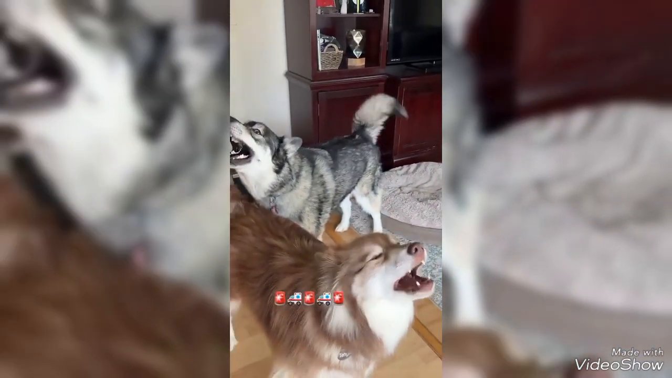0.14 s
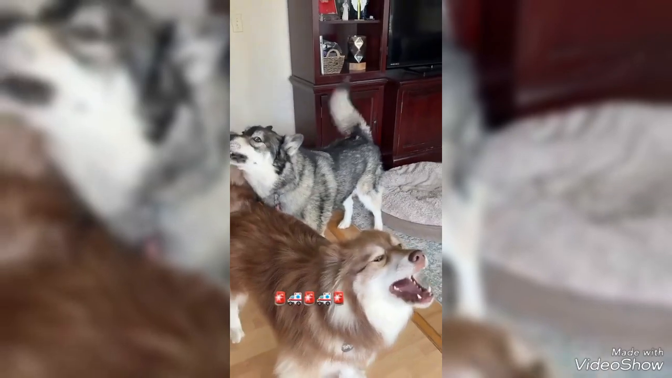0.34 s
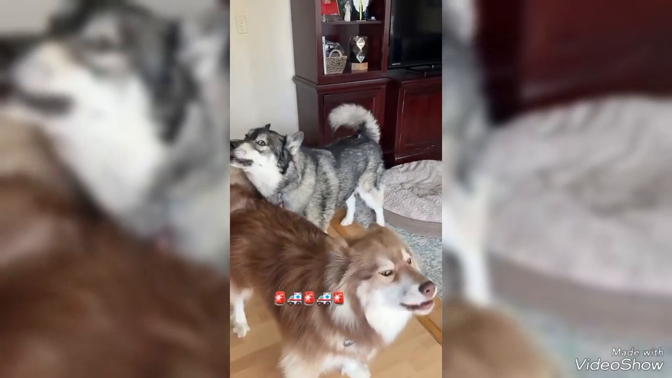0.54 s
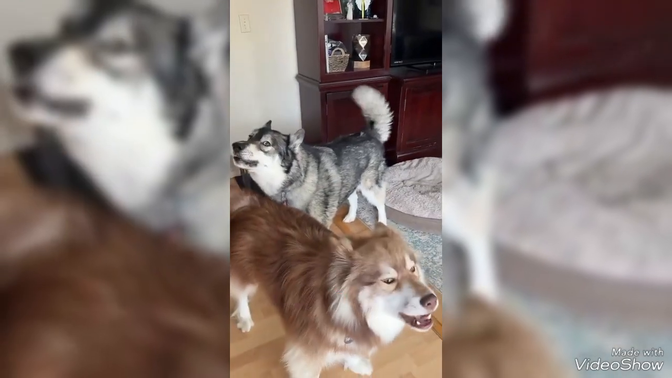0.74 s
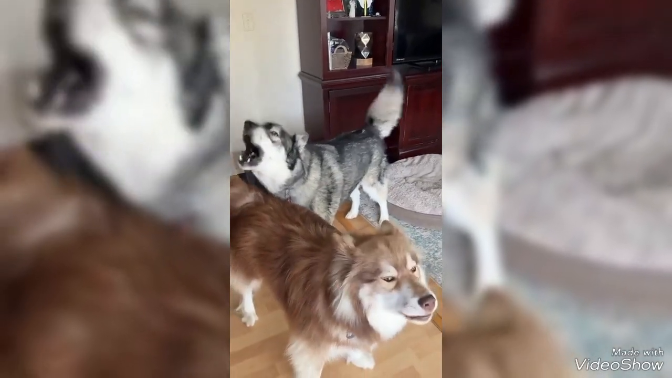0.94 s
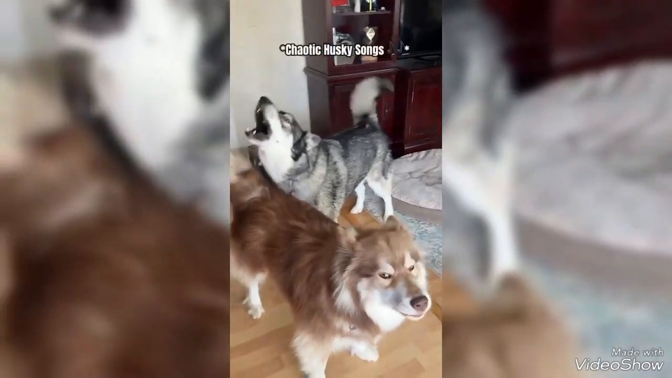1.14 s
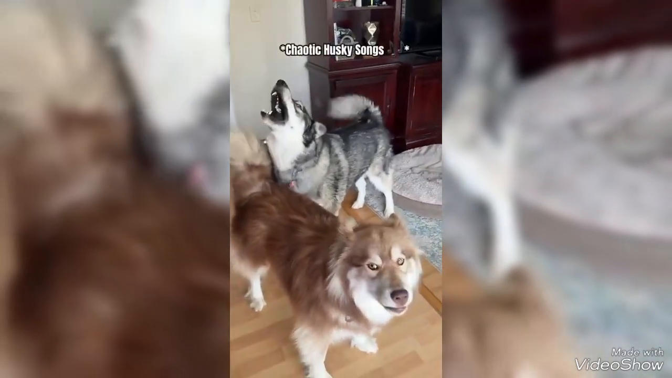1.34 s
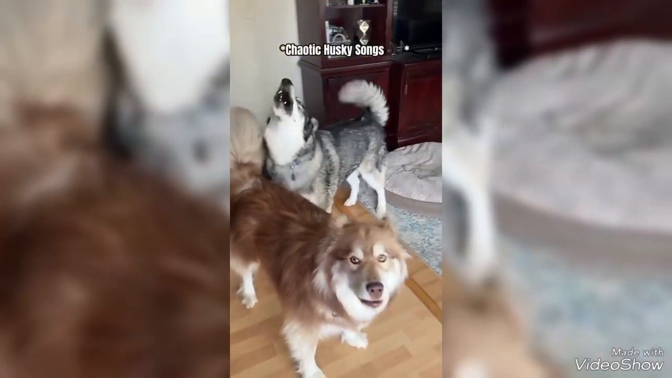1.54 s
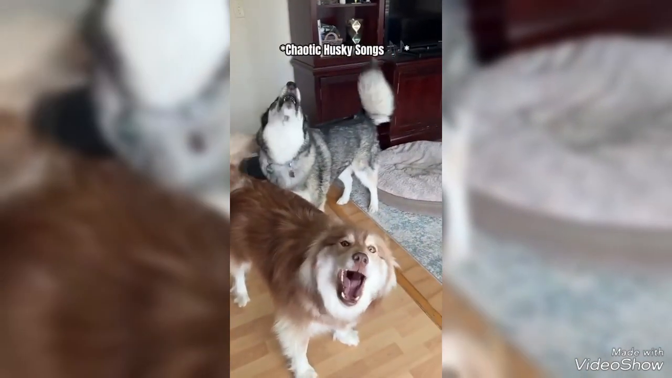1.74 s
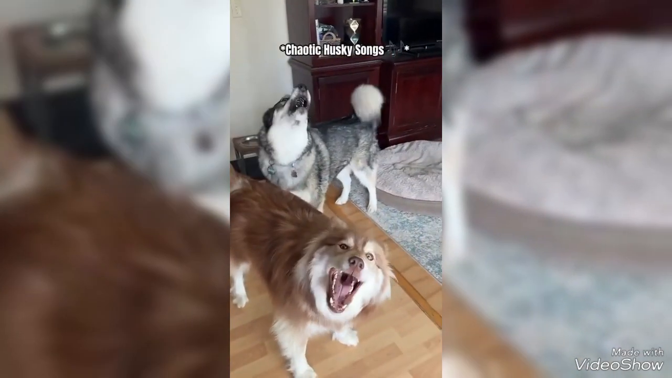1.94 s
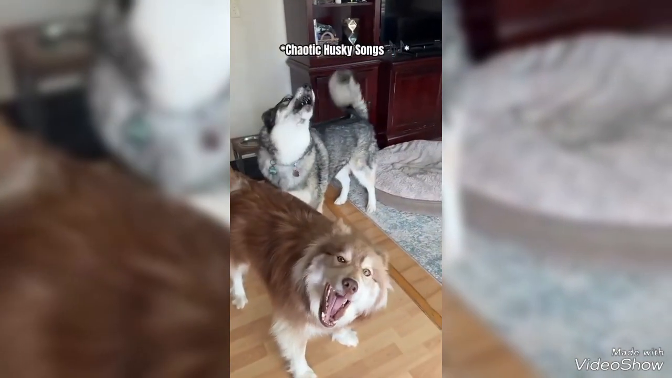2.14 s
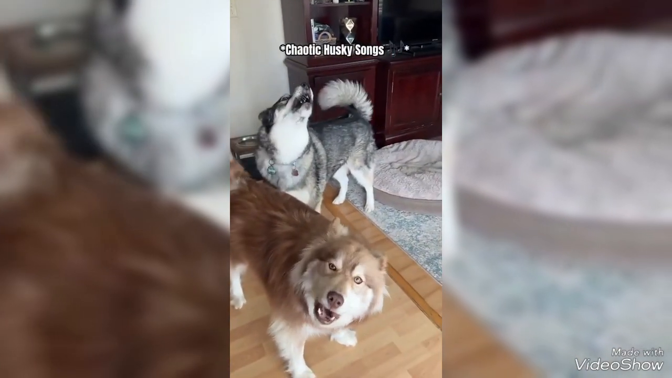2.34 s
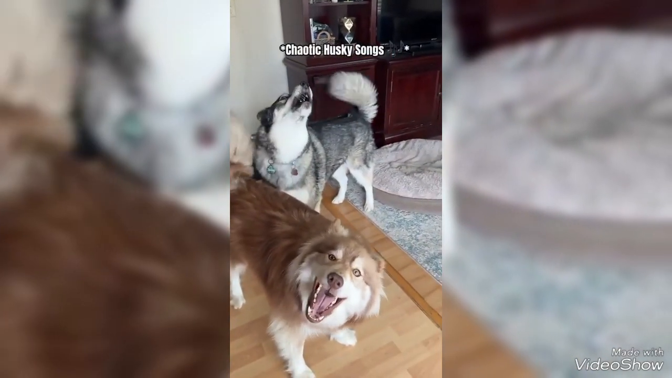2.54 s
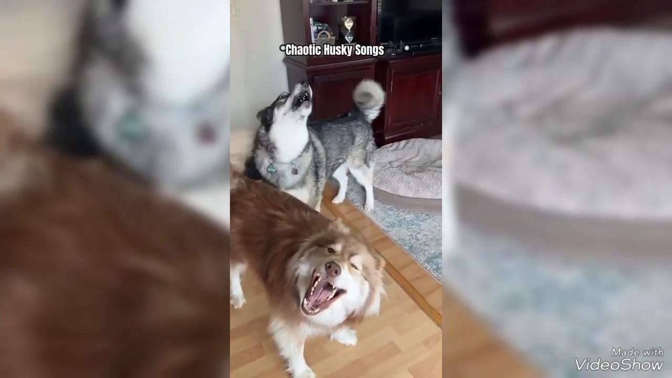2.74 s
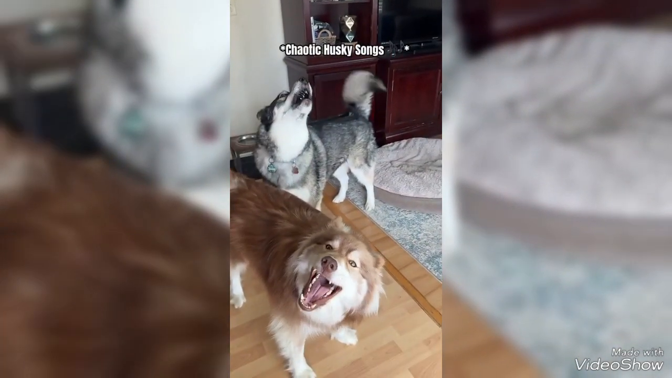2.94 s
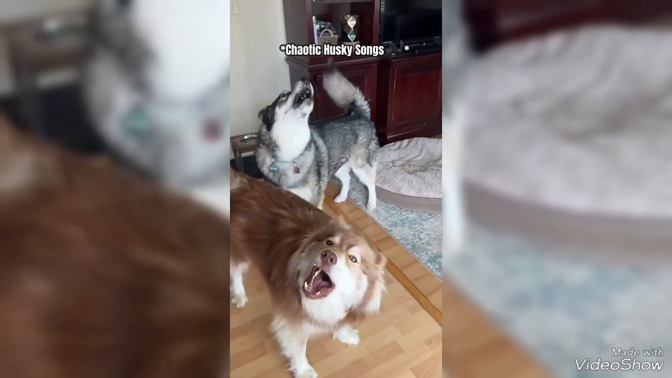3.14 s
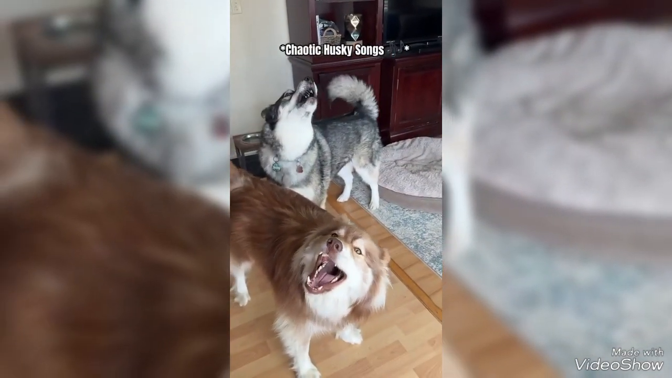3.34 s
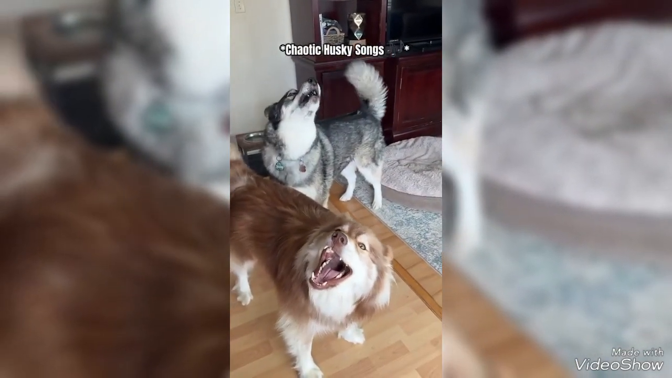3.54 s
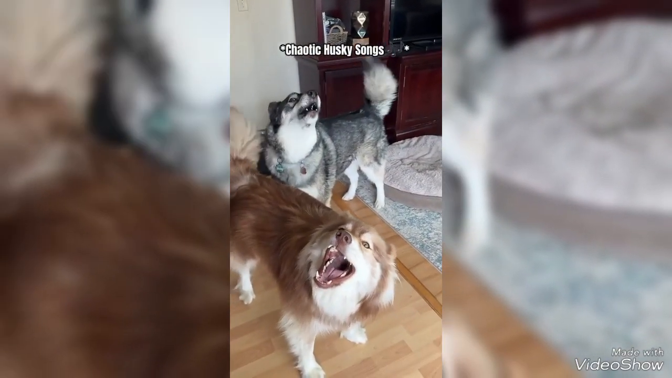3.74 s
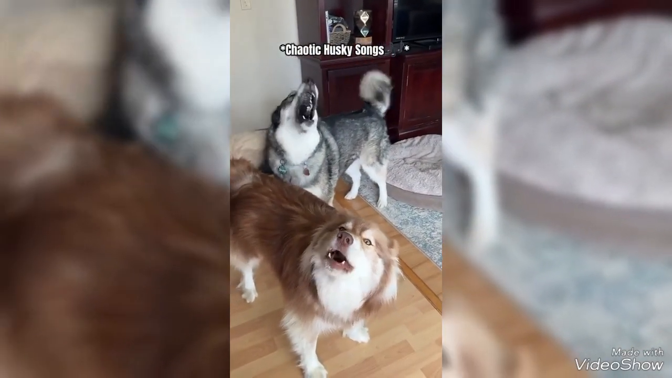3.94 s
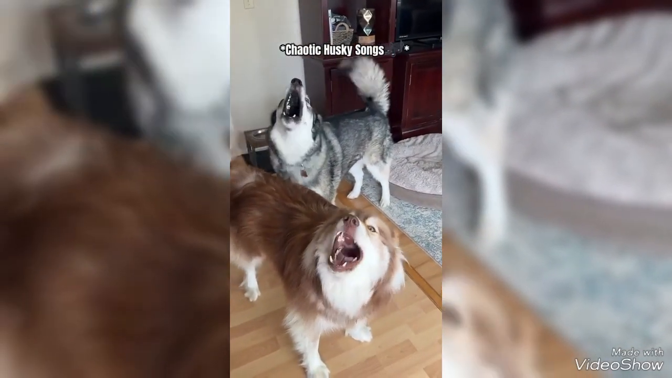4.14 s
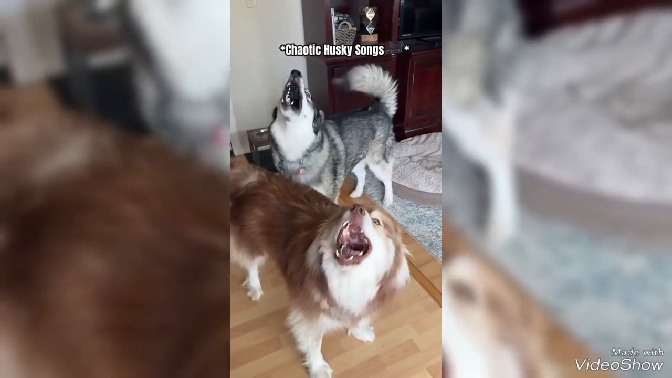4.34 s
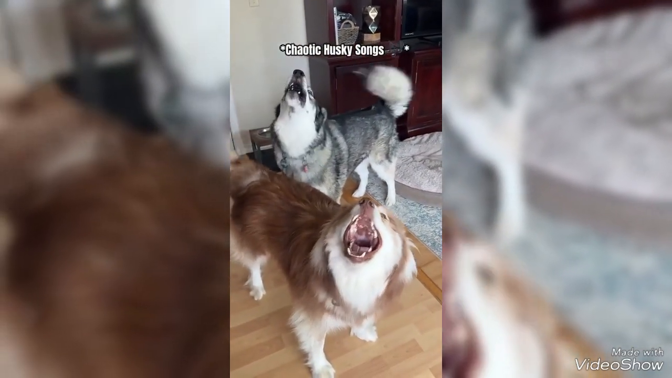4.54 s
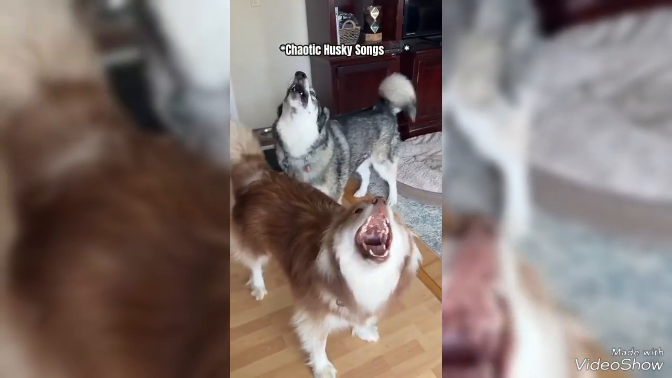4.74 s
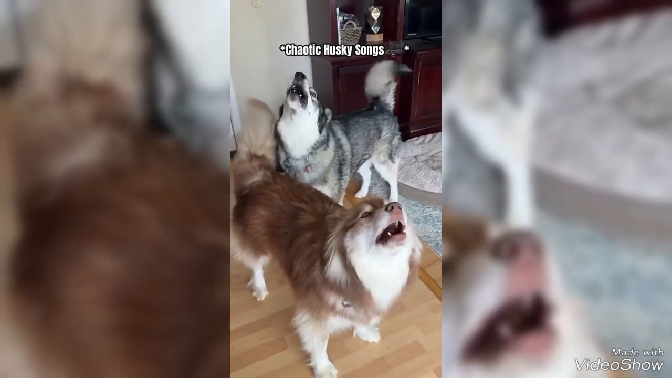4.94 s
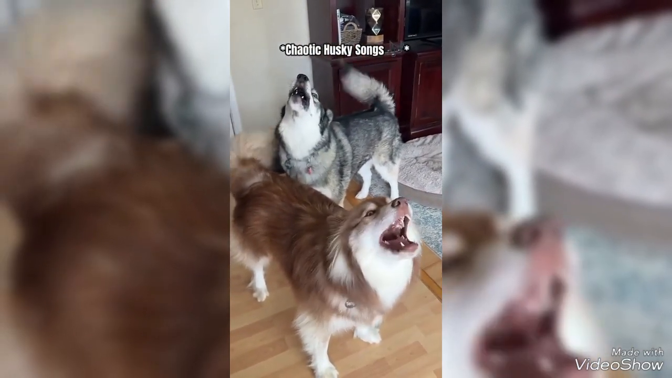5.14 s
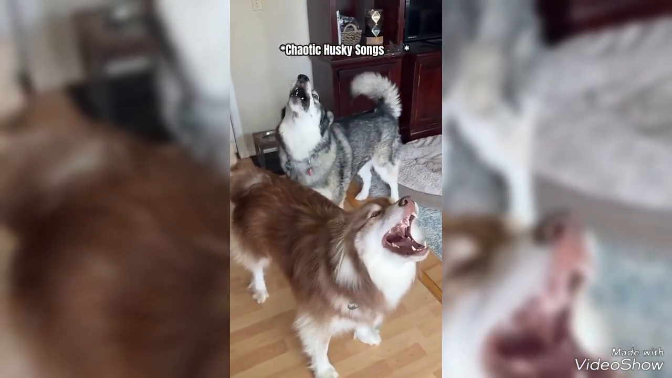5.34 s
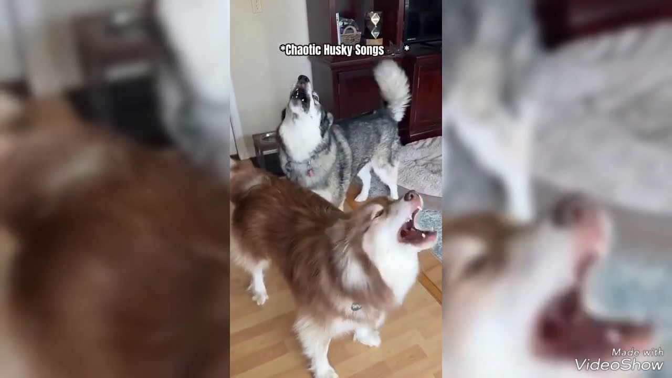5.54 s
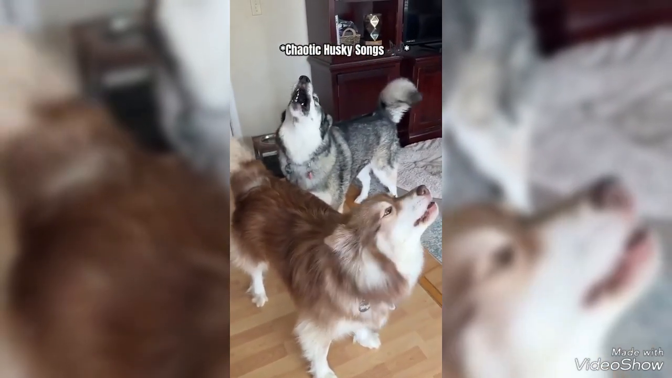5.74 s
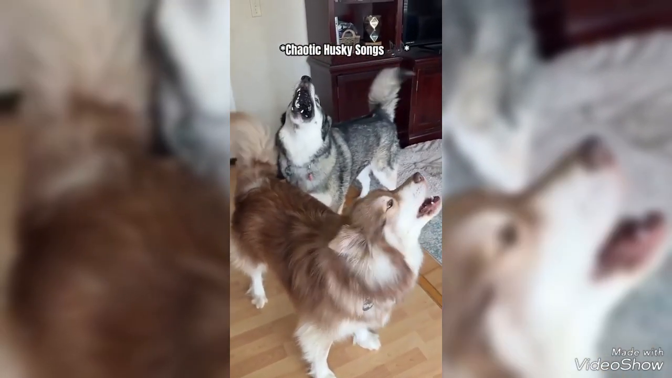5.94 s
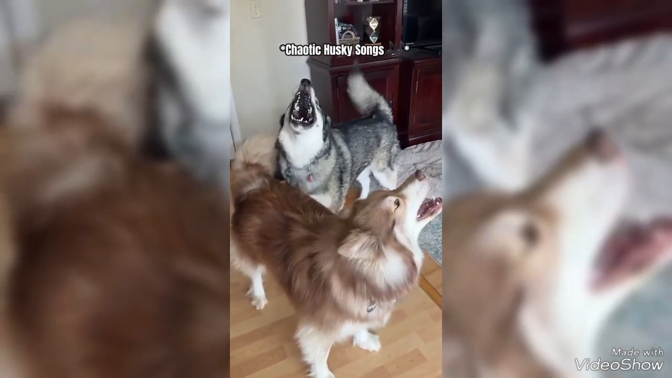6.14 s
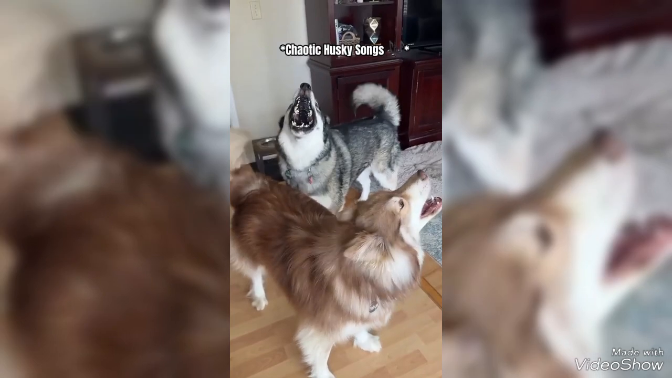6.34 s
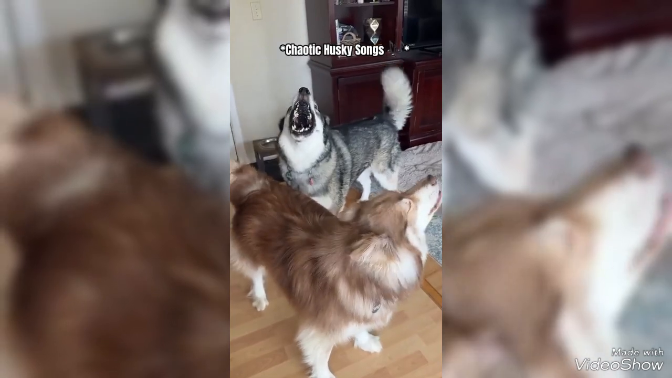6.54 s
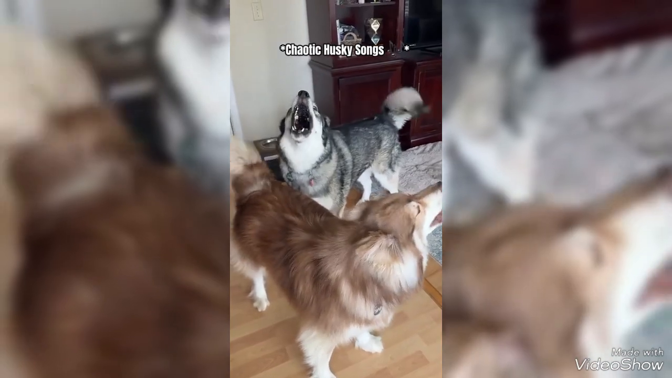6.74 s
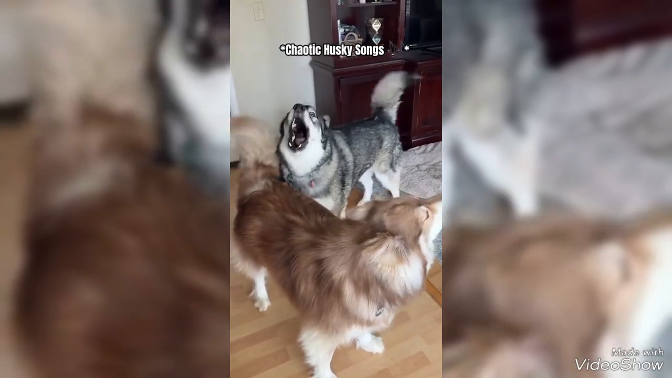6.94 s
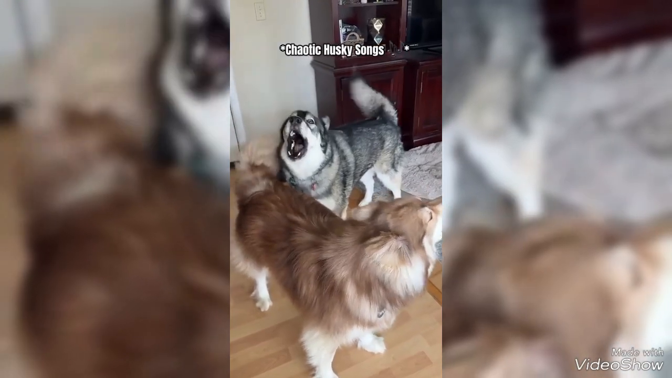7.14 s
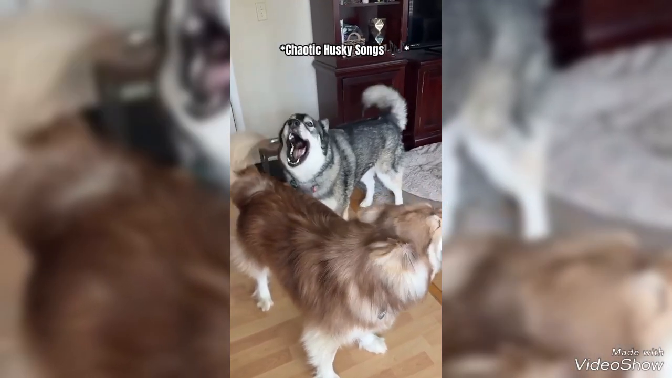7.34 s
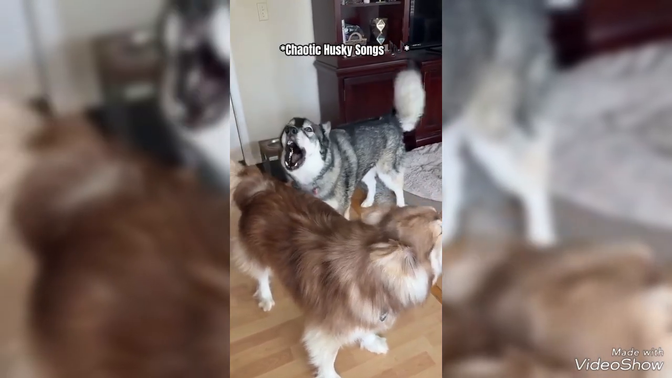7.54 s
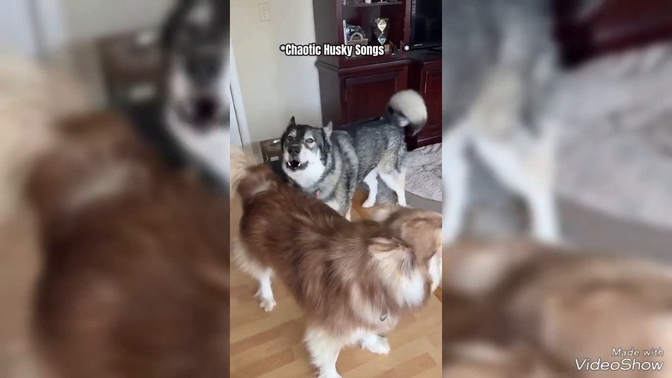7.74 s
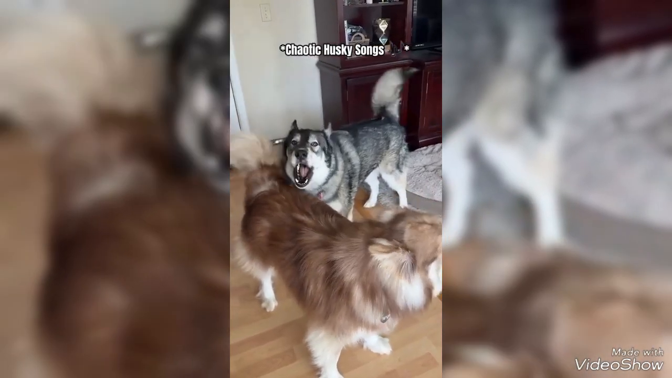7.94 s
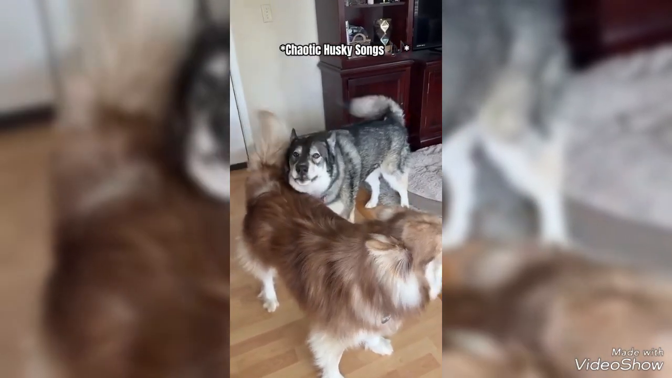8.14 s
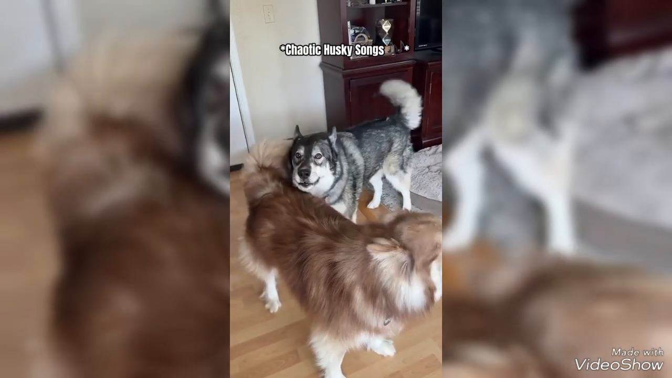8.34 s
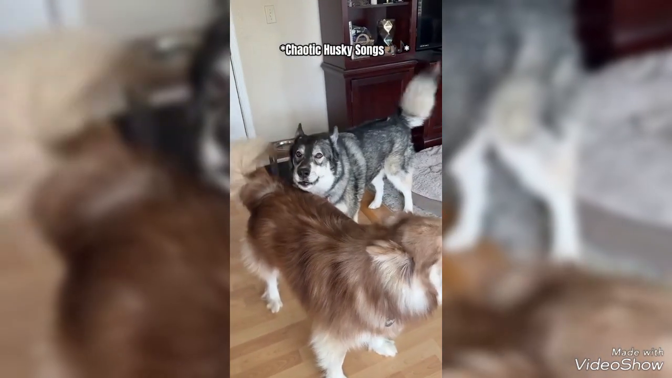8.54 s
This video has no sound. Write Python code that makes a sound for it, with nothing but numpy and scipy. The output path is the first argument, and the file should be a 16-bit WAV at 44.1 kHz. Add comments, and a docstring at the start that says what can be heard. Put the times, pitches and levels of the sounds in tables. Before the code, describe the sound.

Two huskies howl loudly and close in a living room with short, sparse reflections and a barely audible rumble. At 0 s the high dog starts with a rasping cry, then dips and swoops in clear wavering tones until about 0.9 s. The low dog bursts in hoarsely at 0.95 s, rises a little, then sinks to a long steady moan until 3.5 s. From 1.7 s the high dog leaps into a long bright arch lasting to 5.7 s, with dips near 2.4, 4 and 5 s, a thin whistle on top and gritty split tones. At 3.9 s the low voice cracks roughly, climbs, falls and holds again. From 6 s both break into shorter phrases: high wows rise and fall over a shaky, growling low wow-wow, with harsh bursts near 7 and 7.3 s. Brief yelps end it around 8.0 to 8.5 s. Soft thumps are almost buried.

```python
"""In a living room, two huskies howl together, heard close up.
One sings high arches with a thin whistle on top; the other holds a low note and ends in hoarse wow-wows.
Each voice is a stack of harmonics shaped by a throat; it passes between clean tone, split (subharmonic)
tone and rasp, which is chaotic partials and puffs of air through throat, mouth and teeth.
The room answers with brief sparse reflections, over a faint filtered-noise rumble with soft thumps."""
import sys
import numpy as np
from scipy import signal
from scipy.fft import rfft, irfft
from scipy.io import wavfile
from scipy.ndimage import uniform_filter1d, minimum_filter1d

SR = 44100
rng = np.random.default_rng(int(sys.argv[2]) if len(sys.argv) > 2 else 0)


def store_wav(level_fs):
    """Save 16-bit WAV to argv[1]."""
    pcm = np.round(np.clip(np.atleast_2d(level_fs), -1, 1) * 32767)
    wavfile.write(sys.argv[1], SR, pcm.T.astype(np.int16))


N = 379260
TIME = np.arange(N) / SR
BINS = np.fft.rfftfreq(N, 1 / SR)
EDGE_HZ = 15750  # upper limit of the sound

# gain of each throat on the overtones: (frequency [Hz], gain [dB])
HIGH_THROAT = [(1100, 12), (1600, 14.5), (2400, 3), (3100, -9), (3800, -35), (5200, -34.5), (6400, -17.5),
               (7600, -32.5), (9000, -32), (13000, -36.5), (16000, -39.5)]
LOW_THROAT = [(800, 13), (1100, 8.5), (1700, 4), (2300, -9), (2900, -17), (3700, -32.5), (4900, -21),
              (6300, -16.5), (7200, -44), (11000, -41), (16000, -58)]
# colour of each dog's rasp and split tone: (frequency [Hz], relative level [dB])
HIGH_COLOUR = [(120, -73), (300, -7), (500, -8), (900, 6.5), (1450, 12), (2300, 4), (3000, -3), (3900, -41),
               (6400, -28), (8800, -26.5), (13500, -28), (15500, -33.5)]
LOW_COLOUR = [(170, -42), (270, -24.5), (350, -23.5), (500, -7), (950, 1.5), (1400, -12), (2300, -17),
              (2750, -50), (3600, -44), (6100, -38.5), (8500, -39), (11300, -30), (15500, -45)]


def amp(db):
    """Decibel law: level to amplitude ratio."""
    return 10 ** (np.asarray(db) / 20)


def evened(x):
    """Normalisation by mean power: scales to rms 1."""
    return x / np.sqrt(np.mean(x ** 2) + 1e-20)


def read(points, hz):
    """Spectral interpolation along a logarithmic frequency axis."""
    f, value = np.transpose(points)
    return np.interp(np.log(hz + 1), np.log(f + 1), value)


def coloured(x, points):
    """Linear filtering: multiplies the spectrum by a response in dB."""
    return irfft(rfft(x) * amp(read(points, BINS)), N)


def waver(rate_hz):
    """Low-pass random fluctuation of rms 1, weak above the given rate."""
    noise = rfft(rng.standard_normal(N))
    return evened(irfft(noise / (1 + (BINS / rate_hz) ** 4), N))


def gate(t, start, end, edge):
    """Amplitude window with sine-squared edges."""
    nearest_end = np.minimum(t - start, end - t)
    return np.sin(np.pi / 2 * np.clip(nearest_end / edge, 0, 1)) ** 2


def controls(rows):
    """Linear interpolation: the samples that rows cover, and each column at those samples."""
    s, *columns = np.transpose(rows)
    at = np.flatnonzero((TIME >= s[0]) & (TIME <= s[-1]))
    return at, [np.interp(TIME[at], s, c) for c in columns]


def phrase(rows):
    """Pitch inertia: one long howl whose corners of pitch are rounded by a moving average."""
    glide_s = 0.0088  # the throat needs this long to turn a corner of pitch
    at, (hz, *levels_db) = controls(rows)
    return at, [uniform_filter1d(hz, size=max(int(glide_s * SR), 1)), *levels_db]


def wow(throat, start, end, first_hz, top_hz, last_hz, place, fundamental_db, overtones_db):
    """Frequency and amplitude modulation: pitch bends once under a quick attack and release."""
    attack_s, release_s = 0.017, 0.038
    at = np.flatnonzero((TIME >= start) & (TIME <= end))
    t, place = TIME[at], np.clip(place, .05, .95)
    u = (t - start) / (end - start)
    rising = np.clip(1 - u / place, 0, 1) ** 2
    falling = np.clip((u - place) / (1 - place), 0, 1) ** 2
    hz = top_hz + (first_hz - top_hz) * rising + (last_hz - top_hz) * falling
    swell = np.minimum((t - start) / attack_s, (end - t) / release_s)
    swell_db = 20 * np.log10(np.clip(swell, 1e-3, 1))
    mouth_db = overtones_db + swell_db
    second_db = mouth_db + read(throat, 2 * hz)
    return at, [hz, fundamental_db + swell_db, second_db, mouth_db]


def song(howls, wows, throat):
    """Source control: for each phrase of one dog, its samples, pitch and harmonic levels."""
    return [phrase(rows) for rows in howls] + [wow(throat, *row) for row in wows]


def high_song():
    """Pitch contours of the high dog: long arches, then short wows."""
    # one curve a howl: (time [s], pitch [Hz], fundamental [dB], second harmonic [dB],
    # upper overtones before the throat [dB]); levels before the dog's overall gain
    howls = [
        [(0.0, 783, -13, -42.5, -53.5), (0.144, 797, -15.5, -26.5, -47), (0.241, 516, -15.5, -29, -41),
         (0.295, 557, -11.5, -21, -31.5), (0.325, 655, -16, -25.5, -36), (0.359, 805, -11.5, -22, -35),
         (0.439, 809, -19, -27, -44), (0.519, 491, -15.5, -35.5, -47), (0.554, 573, -47, -25.5, -69),
         (0.599, 549, -16.5, -32.5, -42), (0.676, 716.6, -14.5, -26.5, -49), (0.784, 700.6, -14, -29.5, -49),
         (0.85, 550, -14, -29, -59.5), (0.9, 426, -28, -37, -47.5)],
        [(1.67, 534, -7, -17, -32), (1.772, 660.5, -26.5, -13.5, -17.5), (1.786, 816.7, -12, -19.5, -28),
         (1.971, 926, -6.5, -22, -21.5), (2.077, 930.3, -6, -24, -26), (2.223, 886.6, -10, -21.5, -36.5),
         (2.333, 662, -14, -45.5, -32), (2.386, 655.6, -17, -36.5, -35), (2.451, 859, -11, -22.5, -31),
         (2.534, 913.7, -10, -22.5, -32), (2.895, 912.7, -15.5, -28.5, -32.5), (2.996, 896, -8.5, -18, -27),
         (3.18, 780, -5.5, -30, -39.5), (3.282, 853.3, -7.5, -14.5, -34.5), (3.47, 875.5, -11.5, -25, -41),
         (3.625, 897, -13.5, -27, -43.5), (3.798, 854.3, -10, -21.5, -39), (3.919, 682, -10, -32.5, -30),
         (3.97, 658, -10, -27, -34), (4.087, 602.5, -17, -33, -47.5), (4.156, 788.6, -13.5, -23, -35),
         (4.28, 809, -19.5, -24.5, -38), (4.461, 765.5, -20, -19.5, -33.5), (4.599, 784.7, -13.5, -14.5, -37.5),
         (4.876, 790.6, -9, -12, -29), (5.004, 583, -16, -40, -40.5), (5.045, 569, -9.5, -16, -29.5),
         (5.092, 571, -23, -22.5, -30), (5.134, 772, -3, -14.5, -30), (5.224, 822, -11, -15, -27.5),
         (5.27, 819, -27, -34.5, -48), (5.345, 817.5, -13, -14.5, -26), (5.395, 819, -15, -18.5, -28),
         (5.572, 802.6, -15, -23, -32.5), (5.682, 539, -15.5, -34, -49.5), (5.756, 474, -11.5, -24, -53.5)],
    ]
    # one bend of pitch each: (start [s], end [s], first pitch [Hz], turning pitch [Hz], last pitch [Hz],
    # place of the turn [0-1], fundamental [dB], overtones before the throat [dB])
    wows = [(6, 6.367, 855, 860, 723.6, 0.2, -18.5, -39.5), (6.36, 6.627, 757, 825, 446.5, .33, -18.5, -42),
            (6.631, 6.982, 431.4, 756, 544.5, .47, -18.5, -46),
            (7.08, 7.4, 483.7, 917, 742, 0.8, -19.5, -43), (7.467, 7.6, 452, 769, 752, .74, -17.5, -36.5),
            (8.023, 8.192, 606, 607, 365, 0.4, -18, -46.5), (8.358, 8.44, 516, 641, 650, .8, -13, -26),
            (8.417, 8.551, 834, 825, 615, 0.2, -19, -44)]
    return song(howls, wows, HIGH_THROAT)


def low_song():
    """Pitch contours of the low dog's part: held notes, an unsteady run, and a brief chirp that starts the last yelp."""
    # one curve a howl: (time [s], pitch [Hz], fundamental [dB], second harmonic [dB],
    # upper overtones before the throat [dB]); levels before the dog's overall gain
    howls = [
        [(0.92, 426, -18, -18.5, -43), (0.966, 570, 5.5, -2, -5.5), (1.02, 602, -15, -26.5, -28.5),
         (1.079, 624, -10, -27, -29.5), (1.17, 583.6, -19.5, -24.5, -33.5), (1.208, 584.2, -4, -21, -19.5),
         (1.339, 644.5, -17.5, -20, -30.5), (1.499, 481, -9, -21, -36), (1.66, 435.2, -13, -15, -42),
         (1.77, 422, -32, -18, -45), (1.88, 407.5, -26.5, -33, -63), (2.029, 432.7, -1, -16.5, -50),
         (2.145, 422.4, -38.5, -52, -65.5), (2.4, 410.6, -18, -17, -45.5), (2.47, 408, -20.5, -32, -56.5),
         (2.779, 414.2, -17, -35, -43), (2.93, 431.3, -25, -18.5, -40), (3.12, 414, -13, -19.5, -42.5),
         (3.301, 402, -15, -20.5, -43.5), (3.485, 368.5, -21, -18, -49)],
        [(3.89, 331.8, -17, -3, -55.5), (3.959, 526.5, -32, -14, -24), (4.121, 437.8, -25, -14.5, -50),
         (4.165, 518, -28, -44, -37), (4.196, 573, -22, -28, -26), (4.265, 607.6, -8, -18.5, -20),
         (4.315, 634, -31.5, -31, -40), (4.465, 499, -11.5, -22, -29), (4.559, 415.5, -14, -14, -58),
         (4.59, 414, -16.5, -20, -74), (5.05, 397, -21, -27.5, -53), (5.35, 402, -20, -25, -39.5),
         (5.701, 414.4, -17, -21.5, -48), (5.841, 473.6, -7, -16.5, -36.5), (5.908, 512.5, -13.5, -18.5, -33.5),
         (5.98, 561, -9, -7, -41)],
        [(5.99, 450, -20, -10, -41), (6.115, 441.6, -26.5, -25, -34.5), (6.199, 437.6, -25, -15, -37),
         (6.331, 374, -29.5, -18, -30.5), (6.428, 411.6, -29, -10, -35.5), (6.598, 370, -29, -19.5, -37),
         (6.677, 401.9, -27, -19, -40), (6.872, 354.8, -29.5, -28, -34), (7.017, 440.2, -25, -15, -25.5),
         (7.144, 345.7, -35, -27.5, -43.5), (7.238, 444.3, -18, -8, -30.5), (7.301, 473, -33, -24, -35),
         (7.403, 380, -29.5, -25, -41.5), (7.531, 464.2, -17, -21.5, -33.5), (7.62, 396.2, -34.5, -43, -40),
         (7.715, 408.4, -27, -30, -48.5), (7.758, 415.5, -9.5, -19.5, -39.5), (7.832, 468.2, -19, -15.5, -33.5),
         (7.944, 402.5, -28.5, -27, -45.5), (8.031, 509, -19, -9, -27), (8.087, 570.4, -20, -42.5, -35),
         (8.18, 529.2, -37, -43, -70.5)],
    ]
    # the chirp: (start [s], end [s], first pitch [Hz], turning pitch [Hz], last pitch [Hz],
    # place of the turn [0-1], fundamental [dB], overtones before the throat [dB])
    chirps = [(8.342, 8.383, 745, 638.6, 645, .5, -9, -41)]
    return song(howls, chirps, LOW_THROAT)


def howl(phrases, throat, rasp_db, jitter, shimmer, rough_jitter, cycle_jitter, sway_db,
         usual_hz, lift, register_db, count=20):
    """Source-filter voice: throat-weighted harmonics that shake with rasp; also fold cycles and loudness."""
    out, cycles, loudness = np.zeros((3, N))
    drift, shake, flutter = waver(37.9), waver(171.5), waver(120)
    # each closure comes a little early or late, which frays the highest overtones
    stagger = cycle_jitter * waver(220)
    sway = [sway_db * waver(14) for _ in range(4)]  # the overtones swell and fade unevenly
    for at, (hz, fundamental_db, second_db, overtones_db) in phrases:
        opening = (hz / usual_hz) ** lift  # the jaw opens on high notes and lifts the throat's resonances
        strain_db = register_db * np.log2(hz / usual_hz)  # tilts the treble with pitch
        levels = [amp(fundamental_db), amp(second_db)]
        for k in range(3, count + 1):
            throat_db = read(throat, k * hz / opening)
            treble_db = strain_db * np.clip(k * hz / 2500 - 1, 0, 1)
            levels.append(amp(overtones_db + throat_db + sway[k % 4][at] + treble_db))
        tone = sum(levels[:3])
        rough = np.clip(2 * amp(rasp_db[at]) / tone, 0, 1)
        shaken_hz = hz * (1 + jitter * drift[at] + rough_jitter * rough * shake[at])
        turns = np.cumsum(shaken_hz) / SR
        stack = np.zeros(len(at))
        for k, level in enumerate(levels, 1):
            stack += level * (k * hz < EDGE_HZ) * np.sin(2 * np.pi * k * (turns + stagger[at]))
        voiced = gate(TIME[at], TIME[at[0]], TIME[at[-1]], .006)
        out[at] += np.sqrt(2) * stack * voiced * (1 + shimmer * rough * flutter[at])
        cycles[at], loudness[at] = turns, tone * voiced
    return out, cycles, loudness


def whistle(cycles, sideband_db):
    """Amplitude modulation: the fold cycles chop a second, very high oscillator into sidebands."""
    # on top of the long arches: (start [s], end [s], first frequency [Hz], last frequency [Hz],
    # level before flicker [dB], octave before flicker [dB], octave's sidebands against it [dB])
    notes = [(1.76, 2.083, 6220, 6140, -39.5, -43.5, -4), (2.035, 2.254, 6184, 6220, -33, -57, 10),
             (2.44, 3.167, 6123, 6010, -36, -43.5, -3.5), (3.173, 3.858, 6024, 5900, -38, -48.5, -1),
             (4.124, 4.421, 5900, 6000, -47, -46.5, -6), (4.376, 4.878, 6020, 5804, -39.5, -33.5, -3.5),
             (5.189, 5.36, 6016, 5930, -39, -36, -20), (5.3, 5.568, 5890, 5950, -48, -35, -15)]
    out, drift, flicker = np.zeros(N), 0.0018 * waver(33), amp(1.44 * waver(20))
    for start, end, first_hz, last_hz, db, octave_db, octave_sideband_db in notes:
        at, (hz,) = controls([(start, first_hz), (end, last_hz)])
        turn = np.exp(2j * np.pi * np.cumsum(hz * (1 + drift[at])) / SR)
        fold = np.exp(2j * np.pi * cycles[at])
        chop = 0.27 * fold + fold ** 2 + 0.28 * fold ** 3
        tone = amp(db) * turn * (1 + amp(sideband_db) * chop)
        tone += amp(octave_db) * turn ** 2 * (1 + amp(octave_sideband_db) * chop)
        out[at] += np.sqrt(2) * tone.imag * flicker[at] * gate(TIME[at], start, end, 0.043)
    return out


def split_tone(cycles, rows, colour, unrest, order):
    """Subharmonics: a pattern repeating every few fold cycles puts lines between the harmonics."""
    out, slip = np.zeros(N), unrest * waver(30)
    for start, end, db in rows:
        at = np.flatnonzero((TIME > start) & (TIME < end))
        hz = np.median(np.diff(cycles[at])) * SR
        multiples = [k / order for k in range(order - 1, 7 * order) if k % order]
        lines = np.zeros(len(at))
        for m in multiples:
            phase = m * cycles[at] + slip[at] + rng.random()
            lines += amp(read(colour, m * hz)) * np.sin(2 * np.pi * phase)
        out[at] += amp(db) * evened(lines) * gate(TIME[at], start, end, 0.019)
    return out


def split_tones(high_cycles, low_cycles):
    """Period multiplication: the folds repeat every two, three or four cycles, depending on the passage."""
    # one table a pattern: (start [s], end [s], rms level before the edges fade [dB])
    high_thirds = [(2.552, 3.05, -27.5), (3.307, 3.85, -25), (5.368, 5.591, -19)]
    high_quarters = [(4.294, 4.431, -39), (4.588, 4.85, -21)]
    low_halves = [(0.976, 1.072, -11.5), (1.248, 1.335, -19), (1.334, 1.415, -13.5), (4.177, 4.406, -15),
                  (7.756, 7.886, -17)]
    low_thirds = [(6.034, 6.303, -39), (6.473, 6.774, -18.5), (7.525, 7.61, -11)]
    splits = split_tone(high_cycles, high_thirds, HIGH_COLOUR, unrest=0.29, order=3)
    splits += split_tone(high_cycles, high_quarters, HIGH_COLOUR, unrest=0.055, order=4)
    splits += split_tone(low_cycles, low_halves, LOW_COLOUR, unrest=0.31, order=2)
    splits += split_tone(low_cycles, low_thirds, LOW_COLOUR, unrest=0.15, order=3)
    return splits


def hoarseness(phrases):
    """Envelopes of turbulence in three bands: air follows the voices; each break flares and dies away."""
    # breaks into rasp: (start [s], end [s], throat band [dB], mouth band [dB], hiss [dB]);
    # peak levels before the voice gate, surge and trims
    breaks = [(-.03, 0.131, -7.5, -16, -40), (.3, 0.344, -30.5, -26, -53), (.93, 1.018, -28, -14, -45.5),
              (1.01, 1.056, -9, -17.5, -57), (1.26, 1.328, -30.5, -19.5, -51.5),
              (1.354, 1.409, -12, -37, -53), (1.693, 1.766, -26, -22, -34), (1.769, 1.788, -20, -16, -47),
              (2.058, 2.176, -23, -34.5, -35.5), (2.56, 2.643, -35.5, -27.5, -42),
              (2.659, 2.895, -29, -25, -41), (2.894, 3.075, -37, -25, -39.5),
              (3.316, 3.557, -26.5, -32, -38.5), (3.582, 3.789, -23.5, -16, -34.5),
              (3.912, 4.034, -4.5, -12, -34.5), (4.04, 4.164, -14.5, -26, -41.5),
              (4.183, 4.288, -20, -18.5, -38), (4.307, 4.398, -10.5, -24, -38.5),
              (4.46, 4.85, -36, -19, -36.5), (5.234, 5.301, -13.5, -14, -37.5), (5.33, 5.58, -42, -37, -51),
              (5.96, 6.283, -9, -16, -43.5), (6.302, 6.586, -14.5, -13, -44.5),
              (6.669, 6.816, -11, -19.5, -43.5), (6.941, 7.058, -5, -14.5, -38.5),
              (7.05, 7.183, -21.5, -20.5, -62), (7.229, 7.333, -5, -14, -40), (7.478, 7.551, -9, -16, -43),
              (7.817, 7.87, -21, -17.5, -49), (7.985, 8.075, -18, -14.5, -42),
              (8.113, 8.156, -22, -32, -58), (8.352, 8.405, -23.5, -23, -48),
              (8.425, 8.45, -22.5, -26, -39)]
    # constant air against the voices' loudness, before the same steps: (throat, mouth, hiss [dB])
    air_db = (-37.5, -29.5, -47)
    rise_db_per_s, fall_db_per_s = 468, 278.5
    voice = np.zeros(N)
    for at, (_, fundamental_db, second_db, _) in phrases:
        voice[at] += amp(fundamental_db) + amp(second_db)
    level = amp(air_db)[:, None] * (uniform_filter1d(voice, size=1500) + .003)
    for start, end, *bands_db in breaks:
        at = np.flatnonzero((TIME > start - .2) & (TIME < end + .3))
        t = TIME[at]
        # a break is 4.5 dB weaker at its ends than in its middle
        shape_db = -4.5 * np.clip(2 * (t - start) / (end - start) - 1, -1, 1) ** 2
        shape_db -= rise_db_per_s * np.maximum(start - t, 0)
        shape_db -= fall_db_per_s * np.maximum(t - end, 0)
        level[:, at] = np.maximum(level[:, at], amp(bands_db)[:, None] * amp(shape_db))
    voiced = np.clip(uniform_filter1d(voice, size=600) / .03, .02, 1)
    surge_db = 1.5 * waver(20)
    return 20 * np.log10(level * voiced) + surge_db


def growl(dog, unrest_hz, air_share, throb, order, count):
    """Chaotic fold vibration: randomly fading partials at fractions of the pitch, with puffs of air."""
    _, cycles, loudness = dog
    steps = np.arange(0, TIME[-1] + 1, 1 / unrest_hz)
    step = np.exp(2j * np.pi * cycles / order)
    partial, lines = np.ones(N, complex), np.zeros(N)
    for _ in range(count):
        partial = partial * step
        chance = rng.standard_normal((len(steps), 2)) @ [1, 1j]
        lines += (np.interp(TIME, steps, chance) * partial).real
    voiced = np.minimum(loudness / .01, 1)
    puffs = (0.23 + np.exp(-(cycles % 1) / 0.5)) * rng.standard_normal(N)  # one puff a cycle
    # one strong closure in each pattern
    beat = 1 + throb * np.cos(2 * np.pi * cycles / order + waver(unrest_hz))
    return beat * (evened(lines * voiced) + air_share * evened(puffs))


def rasp(drive, colour, levels_db, trims_db):
    """Resonant filtering: the rough drive rings the throat and the mouth and hisses past the teeth."""
    # where each band's strength is gauged, throat, mouth, hiss: (from [Hz], to [Hz])
    bands = [(550, 1350), (1400, 2600), (4200, 7000)]
    air = rfft(coloured(drive, colour))
    corners_hz = [1050, 1560, 2980, 4050]
    shares = [(1, 0, 0, 0), (0, 1, 1, 0), (0, 0, 0, 1)]  # crossover gains of the bands at the corners
    out = np.zeros(N)
    for (lo, hi), share, db, trim_db in zip(bands, shares, levels_db, trims_db):
        strength = np.std(irfft(air * ((BINS > lo) & (BINS < hi)), N))
        band = irfft(air * np.interp(BINS, corners_hz, share), N)
        out += amp(db + trim_db) * band / strength
    return out


def hoarse_voices(high, low, rasp_db):
    """Alternating sources: the rasp crossfades between the two dogs."""
    # the low dog is the hoarse one here, the high dog elsewhere: (start [s], end [s])
    low_turns = [(0.901, 1.4), (3.898, 4.1), (5.899, 8.3)]
    high_growl = growl(high, unrest_hz=80, air_share=.45, throb=.4, order=4, count=34)
    low_growl = growl(low, unrest_hz=55, air_share=.65, throb=.6, order=3, count=48)
    high_rasp = rasp(high_growl, HIGH_COLOUR, rasp_db, trims_db=(-2, -2.5, -4))
    low_rasp = rasp(low_growl, LOW_COLOUR, rasp_db, trims_db=(-1.5, -1.5, -1.5))
    low_turn = sum(gate(TIME, start, end, 0.045) for start, end in low_turns)
    return low_turn * low_rasp + (1 - low_turn) * high_rasp


def room(x, bass_wet_db, wet_db, treble_wet_db):
    """Reverberation: sparse reflections decay band by band, with a stereo width that varies by band."""
    # reverberation time: (frequency [Hz], time to fall 60 dB [s])
    t60 = [(200, 0.22), (600, 0.32), (2000, 0.25), (6000, 0.16), (15000, 0.28)]
    # stereo width: (frequency [Hz], side against middle [dB])
    width = [(100, -16.5), (1000, -8), (2200, -17), (5000, 2.5), (15000, -5)]
    size = SR // 2
    struck = (rng.random((2, size)) < 2500 / SR) * (TIME[:size] > .003)  # about 2500 reflections a second
    taps = rng.standard_normal((2, size)) * struck
    hz, t, z = signal.stft(taps, SR, nperseg=256)
    decay = amp(-60 * t / read(t60, hz)[:, None])
    tails = signal.istft(z * decay, SR, nperseg=256)[1]
    sent = coloured(x, [(450, bass_wet_db), (1000, wet_db), (5000, treble_wet_db)])
    middle, side = (signal.fftconvolve(sent, tail / np.linalg.norm(tail))[:N] for tail in tails)
    side = coloured(side, width)
    return np.array([middle + side, middle - side])


def house(floor_db, thump_decay):
    """Filtered noise: a faint uneven rumble, briefly raised into a few soft thumps."""
    # noise spectrum: (frequency [Hz], relative level [dB])
    spectrum = [(20, 0.5), (70, -3.5), (250, -7), (600, -14.5), (15000, -34)]
    # soft low thumps: (time [s], peak gain added to the floor [dB])
    thumps = [(1.01, -24), (1.28, -56), (1.5, -50), (1.69, -33), (3.95, -27), (4.47, -38)]
    level = amp(floor_db + 4.5 * waver(6))
    for s, db in thumps:
        level = level + amp(db) * np.exp(-abs(TIME - s) / thump_decay)
    middle, side = (evened(coloured(rng.standard_normal(N), spectrum)) for _ in range(2))
    return level * np.array([middle + .18 * side, middle - .18 * side])


def scene():
    """Superposition: both dogs, their room and the house."""
    high_phrases, low_phrases = high_song(), low_song()
    rasp_db = hoarseness(high_phrases + low_phrases)
    high = howl(high_phrases, HIGH_THROAT, rasp_db[0], jitter=0.00467, shimmer=0.35, rough_jitter=.022,
                cycle_jitter=0.002, sway_db=3.5, usual_hz=840, lift=0.12, register_db=10)
    low = howl(low_phrases, LOW_THROAT, rasp_db[0], jitter=0.00413, shimmer=0.044, rough_jitter=0.01408,
               cycle_jitter=0.0023, sway_db=4.5, usual_hz=437, lift=0.1, register_db=-2.5)
    dogs = amp(3.48) * high[0] + amp(1.68) * low[0]
    dogs += split_tones(high[1], low[1])
    dogs += hoarse_voices(high, low, rasp_db)
    dogs += whistle(high[1], sideband_db=-5.5)
    direct = dogs * amp([[-.4], [.4]])  # slightly stronger on the right
    reflected = room(dogs, bass_wet_db=-6.5, wet_db=-8.0, treble_wet_db=-3.5)
    return direct + reflected + house(floor_db=-58.0, thump_decay=0.011)  # decay in s


def record(dry):
    """Peak limiting: the loudest peaks are held just under full scale; then the band limit."""
    need = 1 / np.maximum(abs(dry).max(0) / .95, 1)
    gain = uniform_filter1d(minimum_filter1d(need, size=400), size=400)
    low_pass = signal.firwin(511, EDGE_HZ, window=("kaiser", 9), fs=SR)
    return signal.oaconvolve(dry * gain, low_pass[None], "same")


dry = scene()
out = record(dry)
store_wav(out)
```